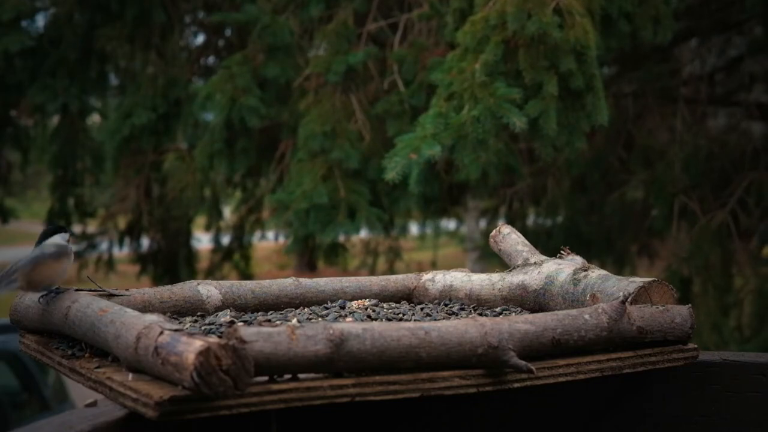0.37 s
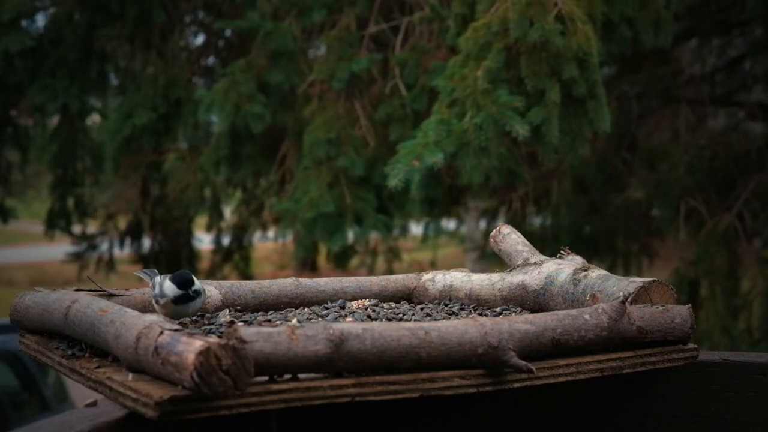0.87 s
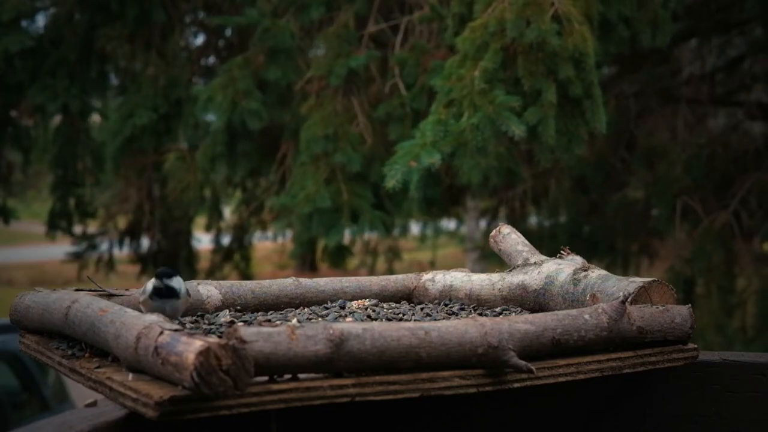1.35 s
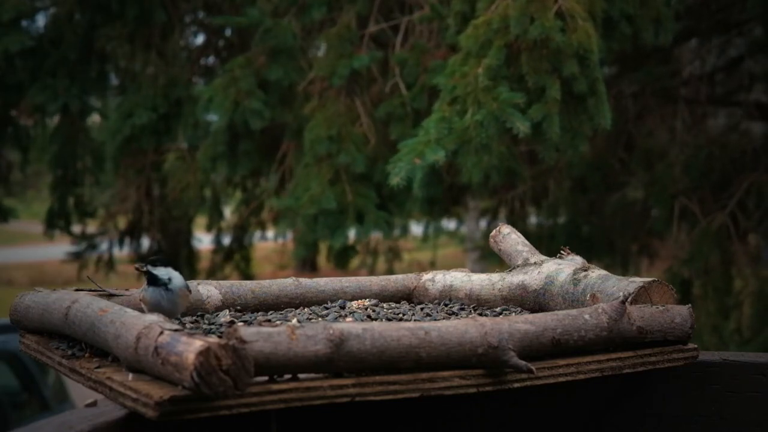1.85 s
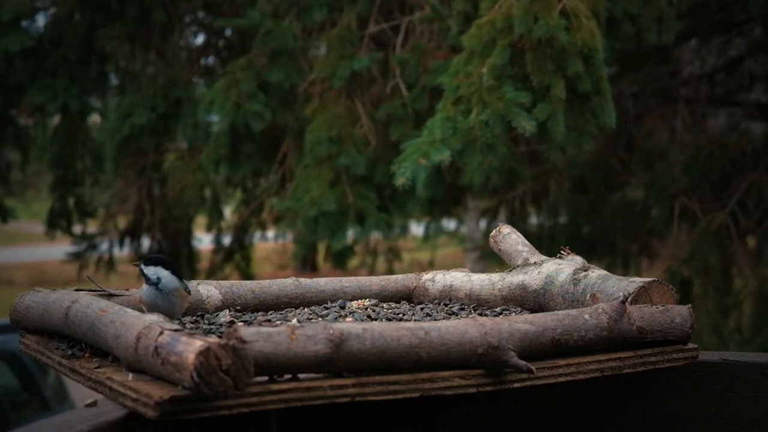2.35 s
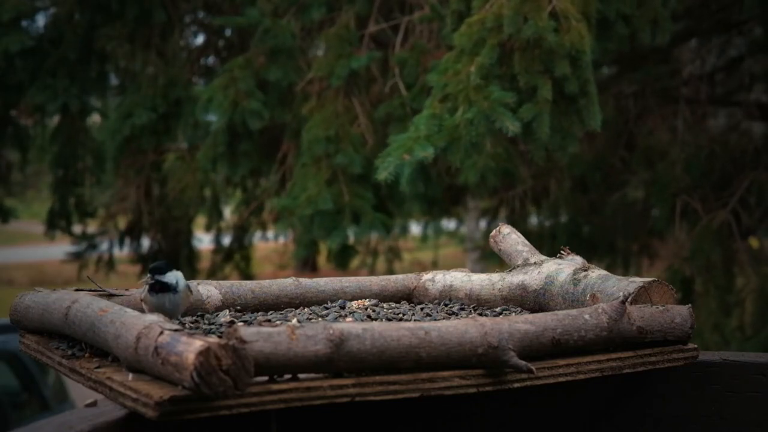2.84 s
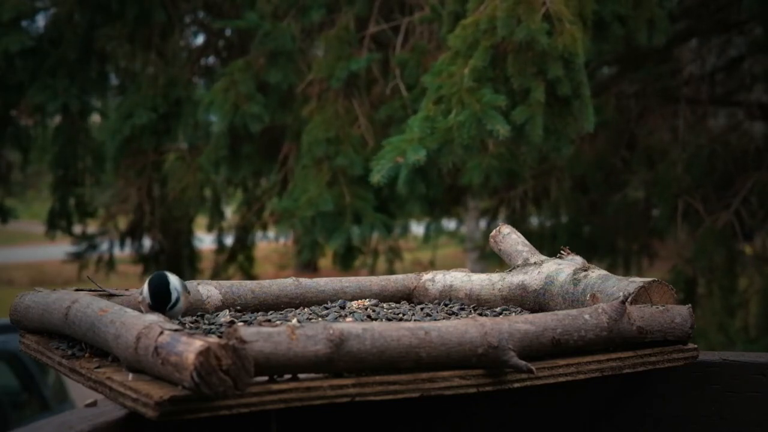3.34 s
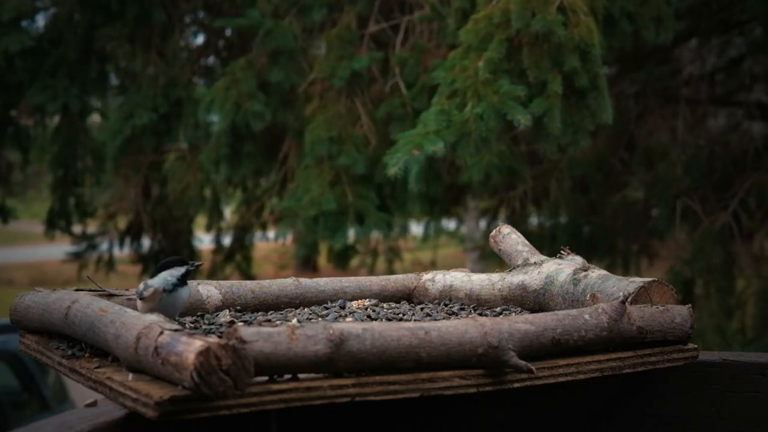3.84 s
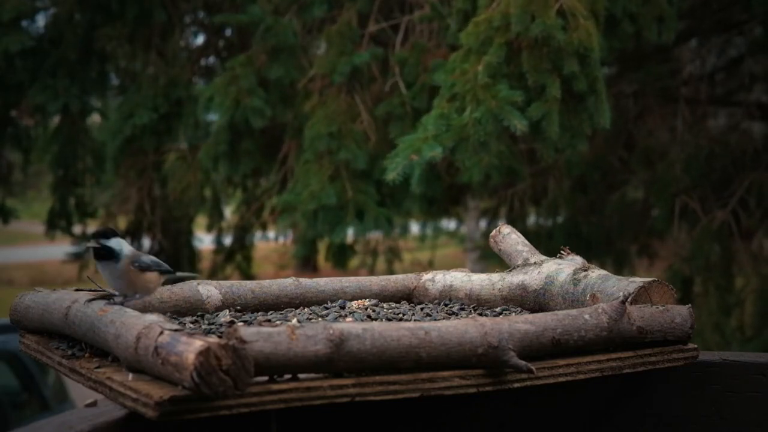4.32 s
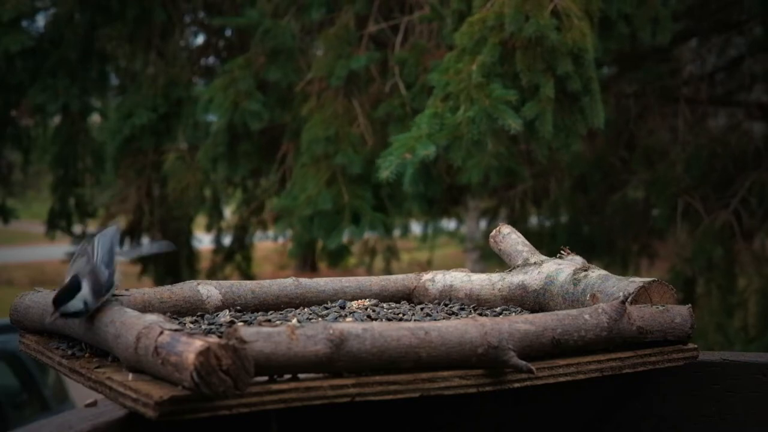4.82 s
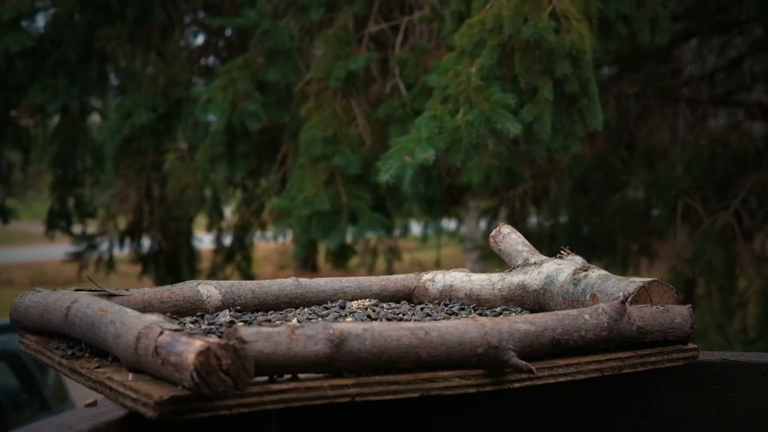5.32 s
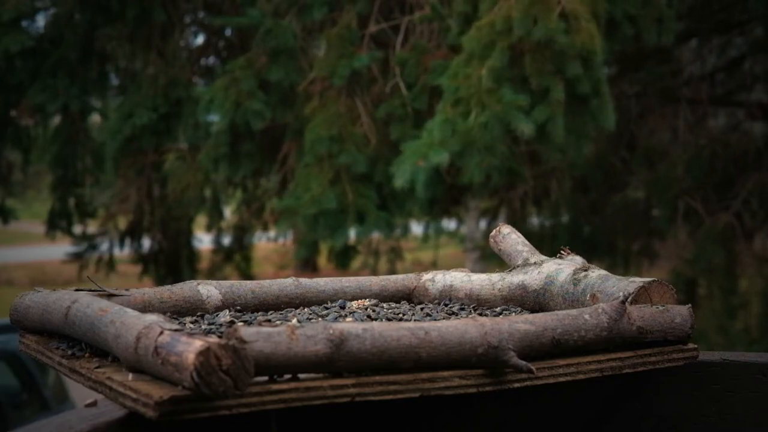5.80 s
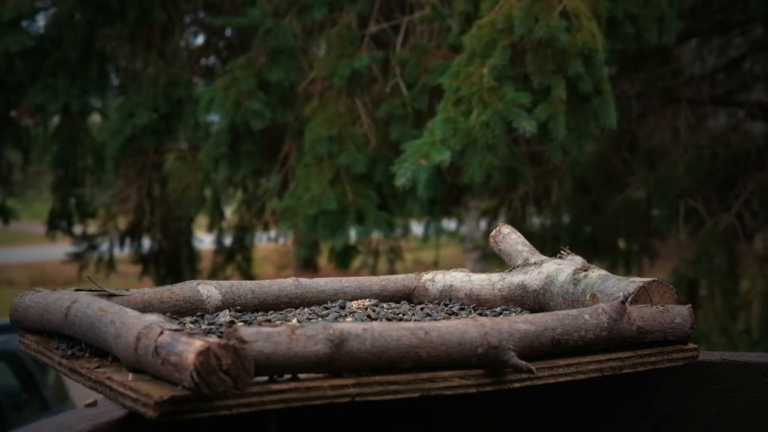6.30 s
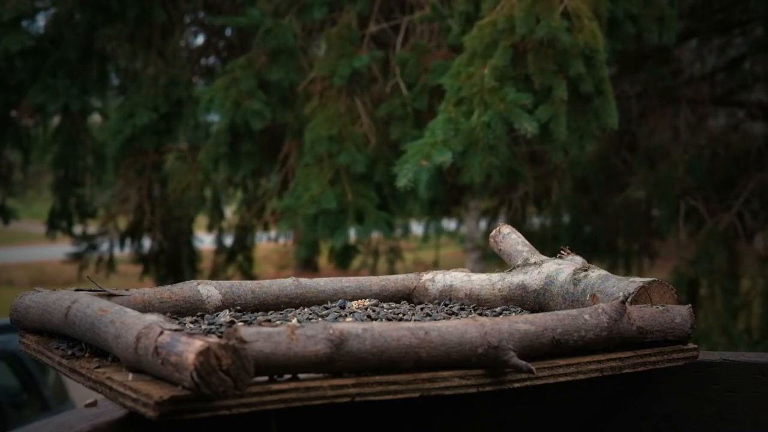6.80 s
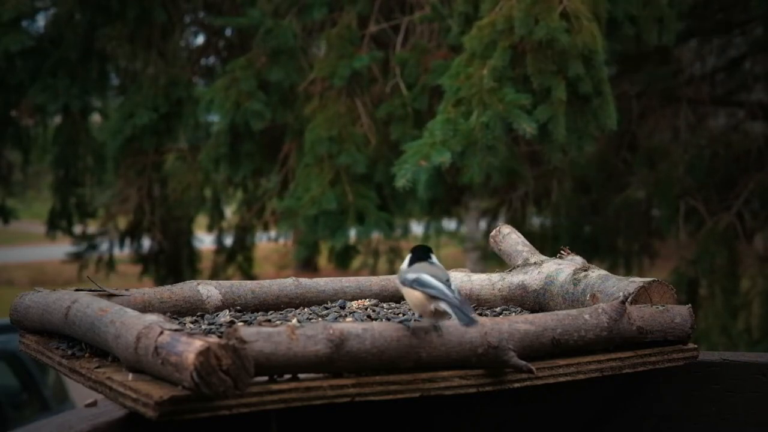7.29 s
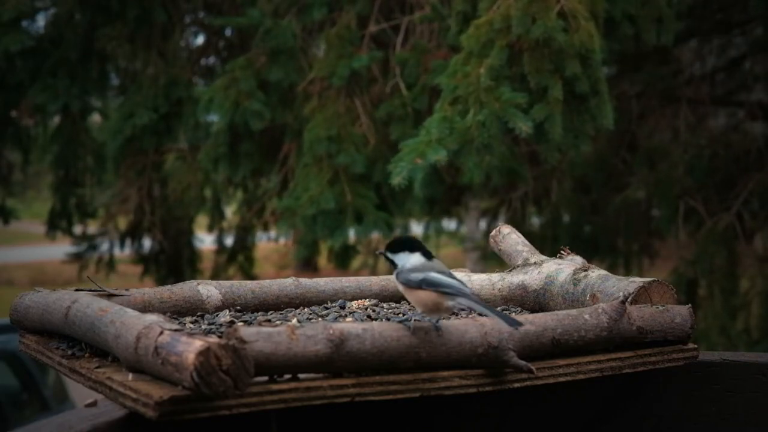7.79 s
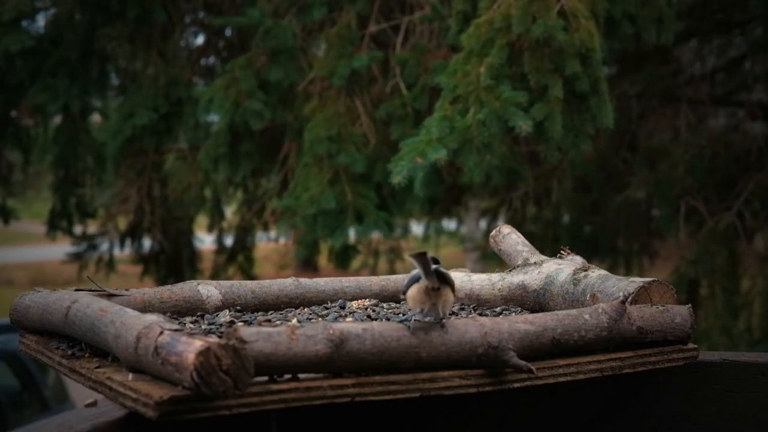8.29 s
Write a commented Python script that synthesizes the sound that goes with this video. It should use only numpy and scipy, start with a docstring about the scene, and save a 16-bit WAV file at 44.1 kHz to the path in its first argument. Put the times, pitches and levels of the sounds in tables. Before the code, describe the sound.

Small songbirds whistle, lisp, warble and call nasally around a wooden feeder among conifers, with a sharp chip and faint claw scuffs over soft hiss.

```python
"""Log feeder among conifers: small songbirds call, heard through a bright microphone with little bass.
Gliding sines make clear whistles, a burry warble, thin lisps, a rasp, falling chirps and one sharp chip;
seeps flip between two pitches, and nasal honks are harmonics shaped by a throat. Noise ticks of feet
scuff the ringing logs. All scatter off the trees, over filtered-noise foliage hiss and a far chorus of
faint notes; a widener spreads the single channel."""
import sys
import numpy as np
from scipy import signal
from scipy.fft import rfft, irfft, next_fast_len
from scipy.io import wavfile
from scipy.ndimage import uniform_filter1d

SR = 44100
rng = np.random.default_rng(int(sys.argv[2]) if len(sys.argv) > 2 else 0)


def dump(signal):
    """Clip the signal to [-1, 1] and save it as 16-bit WAV at the path in sys.argv[1]."""
    limited = np.clip(np.atleast_2d(signal).T, -1, 1)
    pcm = np.round(limited * 32767).astype(np.int16)
    wavfile.write(sys.argv[1], SR, pcm)


def gain_from_decibels(decibels):
    """Convert decibel values to linear amplitude factors."""
    exponent = np.asarray(decibels, float) / 20
    return 10 ** exponent


N = 381465
TIME_S = np.arange(N) / SR

# Note levels are those of the source, ahead of breath shape, scatter and microphone.
# level whistles: (start [s], length [s], pitch [Hz], level [dB])
WHISTLES = [(0.013, 0.097, 4163, -61), (0.209, 0.11, 4280, -63), (0.606, 0.054, 2480, -63.5),
            (0.784, 0.16, 2745, -65.5), (0.94, 0.082, 2600, -64), (1.834, 0.046, 2710, -62.5),
            (2.016, 0.079, 4290, -60), (2.209, 0.084, 3044, -58.5), (2.495, 0.09, 4240, -60),
            (2.992, 0.15, 3300, -64), (3.698, 0.03, 6260, -59.5), (3.918, 0.052, 6320, -56.5),
            (1.452, 0.16, 3640, -62), (3.319, 0.2, 2736, -72), (6.13, 0.059, 2640, -65),
            (6.526, 0.038, 4145, -55), (6.726, 0.021, 4630, -55), (6.933, 0.08, 3770, -68)]
# clear sweeps up or down: (start [s], length [s], start pitch [Hz], end pitch [Hz], level [dB])
SWEEPS = [(1.513, 0.065, 2000, 2950, -71.5), (5.624, 0.061, 2530, 2150, -67.5),
          (5.692, 0.048, 2350, 2900, -60), (5.734, 0.035, 2885, 2560, -57.5),
          (5.871, 0.044, 6050, 6420, -59), (2.255, 0.027, 2990, 5600, -50), (4.442, 0.044, 5100, 3950, -57),
          (4.659, 0.049, 4780, 4010, -56), (5.143, 0.042, 5200, 4920, -54), (5.915, 0.017, 6250, 4620, -49),
          (8.052, 0.18, 1114, 1305, -73.5), (8.293, 0.028, 5470, 5180, -56.5)]
# lightly rolled whistles that settle early: (start [s], length [s], start pitch [Hz], end pitch [Hz], level [dB])
ROLLS = [(2.035, 0.1, 2960, 3340, -43), (2.108, 0.077, 3256, 3010, -45), (5.982, 0.075, 4330, 3556, -51),
         (0.22, 0.06, 2960, 3075, -56), (0.352, 0.15, 3710, 3374, -59.5), (5.43, 0.12, 3080, 3110, -61.5),
         (5.55, 0.028, 3270, 2930, -57.5), (5.834, 0.054, 4920, 4530, -50.5),
         (6.112, 0.1, 3380, 3470, -48.5), (6.192, 0.077, 3476, 3424, -43),
         (6.278, 0.074, 4510, 4142, -36.5), (6.352, 0.096, 3470, 3470, -60.5)]
# burry song: (start [s], length [s], start pitch [Hz], end pitch [Hz], level [dB])
WARBLE = [(.66, 0.13, 2880, 3480, -48.5), (.76, 0.059, 3280, 3153, -46.5), (.895, 0.095, 3970, 3750, -44),
          (1.01, 0.096, 2976, 2843, -44), (1.162, 0.069, 2980, 2810, -45.5),
          (1.235, 0.052, 2935, 3100, -43), (1.305, 0.059, 3252, 3188, -39.5),
          (1.365, 0.095, 4100, 3560, -48.5), (1.53, 0.11, 4400, 4720, -44.5),
          (1.764, 0.032, 3120, 3215, -48.5), (1.92, 0.08, 3184, 3034, -41),
          (2.268, 0.028, 4390, 4390, -46.5)]
# whistles that drop onto a held pitch: (start [s], held pitch [Hz], level [dB])
HOOKS = [(6.376, 5080, -52.5), (6.598, 5130, -53), (6.81, 5120, -49.5)]
# short thin contact notes: (start [s], pitch [Hz], level [dB])
LISPS = [(0.655, 7160, -49.5), (1.089, 7240, -51.5), (1.196, 8910, -53), (2.291, 7730, -52.5),
         (3.644, 7020, -52), (4.068, 3720, -61), (4.46, 7240, -52.5), (4.487, 7980, -61),
         (5.724, 6970, -53.5), (5.855, 7360, -52.5), (6.036, 7280, -53.5), (6.411, 7110, -52.5),
         (7.805, 7250, -50), (7.937, 7200, -52), (8.31, 10230, -50)]
# one loud near rasp: (start [s], length [s], start pitch [Hz], end pitch [Hz], level [dB])
RASP = [(1.637, .056, 7610, 7000, -16.8)]
# two-pitch seeps, midway pitch: (start [s], length [s], start pitch [Hz], end pitch [Hz], level [dB])
SEEPS = [(-.06, 0.15, 7240, 7020, -38.5), (1.309, 0.26, 7820, 7250, -39), (6.619, 0.26, 7750, 7110, -57.5)]
# path of the near chip: (time [s], pitch [Hz], level [dB])
CHIP = [(5.033, 7050, -38), (5.038, 8360, -26), (5.04, 8260, -20.5), (5.043, 7270, -23.5),
        (5.048, 6940, -25), (5.051, 6080, -22), (5.052, 4850, -22.5), (5.056, 4220, -43.5),
        (5.061, 2650, -57.5)]
# run of falling chirps: (start [s], pitch factor [ratio], level [dB])
FALLS = [(7.09, 0.97, -57), (7.219, 0.94, -50.5), (7.332, 0.97, -51), (7.451, 1.0, -50.5),
         (7.578, 1.0, -51), (7.702, 0.97, -52)]
# their common shape at factor 1: (time [s], pitch [Hz], relative level [dB])
FALL_SHAPE = [(0, 5386, -5), (.01, 5500, 1.5), (.018, 4800, 0.5), (.028, 4100, -1), (.045, 3700, -6.5),
              (.063, 3050, -11.5)]
# nasal honks: (start [s], pitch before arching [Hz], mid-note throat resonance [Hz], level [dB])
HONKS = [(2.012, 562.5, 2390, -46), (2.124, 530, 2340, -45.5), (3.086, 564, 2460, -44.5),
         (3.214, 513, 2520, -52.5), (3.756, 542, 2590, -52), (3.884, 513.4, 2470, -55),
         (4.27, 504, 2230, -65), (7.736, 536, 2730, -52.5), (7.885, 509, 2180, -53.5),
         (8.341, 530, 2670, -40.5), (8.46, 510, 2770, -42)]
# feet and wings on the logs: (start [s], length [s], level before colouring [dB], ring re level [dB])
SCUFFS = [(2.265, 0.1, -68.5, -22), (3.423, 0.026, -72.5, -16), (6.055, 0.039, -54.5, -29),
          (6.412, 0.013, -66, -9), (6.634, 0.036, -61, -20), (6.901, 0.037, -61, 1), (7.44, 0.015, -65, -6),
          (8.312, 0.038, -63.5, -17), (8.504, 0.026, -59.5, -15)]
# hollow log modes: (frequency [Hz], t60 [s], relative level [dB])
LOG_MODES = [(1253, 0.042, 8.5), (2630, 0.027, 7), (3300, 0.016, -42)]
# far birds, mean level of one note: (time [s], level [dB])
CHORUS = [(0, -71), (.3, -76), (4.8, -85.5), (5.3, -69.5), (5.7, -77), (6.0, -71.5), (6.8, -75),
          (7.5, -73.5), (8.2, -69), (8.65, -76.5)]
# relative hiss spectrum: (frequency [Hz], density [dB per Hz])
HISS = [(60, -66), (100, -51.5), (480, -36.5), (1180, -24.5), (2200, -16.5), (3300, -9), (4100, -7.5),
        (4500, -8), (5200, -2), (5900, -7), (8100, -7.5), (10000, -14.5), (15500, -18)]
# side against mid: (frequency [Hz], level [dB])
WIDENER = [(200, -4), (700, -7), (4400, -7), (8000, -7), (15000, -11.5)]

HOOK_S, HOOK_RISE = 0.105, 1.19  # length; start pitch over held pitch
LISP_S, HONK_S = 0.026, 0.076
SEEP_SWING_HZ = 505  # either side of the midway pitch
PAIR_GAP_S = 0.2  # a honk starting this soon after another is the answer of a pair
# throat narrowness: dB per squared octave at the reference pitch, and its growth per Hz above
NARROW_DB, NARROW_DB_PER_HZ, NARROW_AT_HZ = 89, 1.6, 530
TREES_T60_S = 0.31
NEAR_T60_S, NEAR_DB = 0.027, 4.5  # first echoes off logs and nearest boughs; level re scatter
HISS_DB = -57
MIC_BEND = 0.016  # square-law share, before its filter
WIDENER_PEAK_S = 0.029
TOP_HZ = 15780


def colour(x, points):
    """Filter by (frequency [Hz], gain [dB]) points, log-frequency interpolated."""
    hz, db = np.transpose(points)
    size = next_fast_len(len(x) + 4096)
    bin_hz = np.fft.rfftfreq(size, 1 / SR) + 1  # offset avoids log 0
    gain = gain_from_decibels(np.interp(np.log(bin_hz), np.log(hz), db))
    return irfft(rfft(x, size) * gain, size)[:len(x)]


def unit(x):
    """Scale to rms 1."""
    return x / np.sqrt(np.mean(x ** 2))


def unit_energy(x):
    """Scale an impulse response to energy 1."""
    return x / np.sqrt(np.sum(x ** 2))


def walk(rate_hz, size):
    """Smooth chance that changes rate_hz times a second; spread near 1."""
    k = max(int(SR / rate_hz), 1)
    steps = np.repeat(rng.standard_normal(size // k + 2), k)
    return 1.3 * uniform_filter1d(uniform_filter1d(steps, k), k)[:size]


def add(track, start_s, sound):
    """Mix a sound in at its start, trimmed to the track."""
    i = int(start_s * SR)
    sound = sound[max(-i, 0):N - i]
    track[max(i, 0):max(i, 0) + len(sound)] += sound


def swell(length_s, edge):
    """Progress 0-1 through a note and its breath pressure."""
    q = np.linspace(0, 1, int(length_s * SR))
    return q, np.sin(np.pi * q) ** edge


def tone(hz):
    """A sine of rms 1 that follows the pitch."""
    return np.sqrt(2) * np.sin(2 * np.pi * np.cumsum(hz) / SR)


def glides(notes, shiver, shiver_hz, waver_db, edge, settle=1):
    """Single-membrane notes: a glide (sooner for larger settle), uneven relative shiver, unsteady breath."""
    out = np.zeros(N)
    for start_s, length_s, from_hz, to_hz, db in notes:
        q, breath = swell(length_s, edge)
        hz = to_hz + (from_hz - to_hz) * (1 - q) ** settle
        beat = tone(shiver_hz * (1 + 0.3 * walk(60, len(q)))) + 0.6 * walk(250, len(q))
        waver = walk(120, len(q))
        gain = gain_from_decibels(db + waver_db * (waver - waver.mean()))
        add(out, start_s, gain * breath * tone(hz * (1 + shiver * beat)))
    return out


def warble():
    """Burry song: the pitch shivers strongly around each glide."""
    return glides(WARBLE, shiver=0.028, shiver_hz=104.85, waver_db=1.5, edge=0.61)


def whistles():
    """Nearly pure level notes and sweeps with a faint shiver."""
    level_notes = [(start_s, length_s, hz, hz, db) for start_s, length_s, hz, db in WHISTLES]
    return glides(level_notes + SWEEPS, shiver=0.0082, shiver_hz=61, waver_db=2.0, edge=0.28)


def rolls():
    """Whistles with a light fast roll, reaching their end pitch early."""
    return glides(ROLLS, shiver=0.0079, shiver_hz=85.5, waver_db=3.5, edge=0.17, settle=2.6)


def hooks():
    """Whistles that start high and settle down onto the held pitch."""
    notes = [(start_s, HOOK_S, HOOK_RISE * hz, hz, db) for start_s, hz, db in HOOKS]
    return glides(notes, shiver=0.001, shiver_hz=61, waver_db=1.5, edge=0.52, settle=2.2)


def lisps():
    """Brief level notes roughened by shiver."""
    notes = [(start_s, LISP_S, hz, hz, db) for start_s, hz, db in LISPS]
    return glides(notes, shiver=0.014, shiver_hz=133.0, waver_db=3.0, edge=0.46)


def rasp():
    """A short falling note, harsh from deep fast shiver."""
    return glides(RASP, shiver=0.04, shiver_hz=170, waver_db=3, edge=1.3)


def seeps():
    """The pitch dwells on a high and a low step and jumps between them, so two bands sound."""
    out = np.zeros(N)
    for start_s, length_s, from_hz, to_hz, db in SEEPS:
        q, breath = swell(length_s, 0.3)
        flip = np.tanh(5.0 * tone(76 * (1 + 0.2 * walk(40, len(q)))))
        hz = from_hz + (to_hz - from_hz) * q + SEEP_SWING_HZ * flip + 110 * walk(300, len(q))
        add(out, start_s, gain_from_decibels(db + walk(200, len(q))) * breath * tone(hz))
    return out


def chip():
    """One sine: a fast hook up, then a dive of over five kilohertz."""
    time_s, hz, db = np.transpose(CHIP)
    sounding = (TIME_S > time_s[0]) & (TIME_S < time_s[-1])
    return gain_from_decibels(np.interp(TIME_S, time_s, db)) * sounding * tone(np.interp(TIME_S, time_s, hz))


def falls():
    """The same steep-then-slow dive, repeated."""
    out = np.zeros(N)
    shape_s, shape_hz, shape_db = np.transpose(FALL_SHAPE)
    t = TIME_S[:int(shape_s[-1] * SR)]
    for start_s, factor, db in FALLS:
        gain = gain_from_decibels(db + np.interp(t, shape_s, shape_db) + 1.5 * walk(120, len(t)))
        hz = uniform_filter1d(np.interp(t, shape_s, shape_hz), size=150)
        add(out, start_s, gain * tone(factor * hz))
    return out


def honks():
    """A buzz of harmonics 3-9 through the throat; a first honk arches, its answer sags, both crack at the end."""
    out = np.zeros(N)
    answers = np.diff([row[0] for row in HONKS], prepend=0) < PAIR_GAP_S
    for answer, (start_s, top_hz, throat_mid_hz, db) in zip(answers, HONKS):
        q, breath = swell(HONK_S, 0.46)
        if answer:
            drop = 0.045 * (q - 0.5) + 0.08 * q ** 8
        else:
            drop = 0.076 * np.exp(-q / 0.12) + 0.15 * q ** 7
        # the pitch roughens as the bill opens
        hz = top_hz * (1 - drop) + (7.5 + 14 * q ** 5) * walk(130, len(q))
        throat_hz = throat_mid_hz * (1 + 0.27 * (q - 0.5))
        # tenser, higher honks come through a narrower throat
        narrow_db = NARROW_DB + NARROW_DB_PER_HZ * (top_hz - NARROW_AT_HZ)
        buzz = 0
        for k in range(3, 10):
            # the -27 dB floor is a soft low shoulder that lets the third harmonic through
            throat_db = np.maximum(-narrow_db * np.log2(k * top_hz / throat_hz) ** 2, -27)
            top_loss_db = 51 * max(k * top_hz / 3200 - 1, 0) ** 0.5
            buzz = buzz + gain_from_decibels(throat_db - top_loss_db + 2.7 * walk(120, len(q))) * tone(k * hz)
        add(out, start_s, gain_from_decibels(db) * breath * unit(buzz))
    return out


def scuffs():
    """Claws scratch in uneven noise ticks; the hollow log's decaying modes ring briefly."""
    out, t = np.zeros(N), TIME_S[:SR // 10]
    ring = sum(gain_from_decibels(db - 60 * t / t60_s) * np.sin(2 * np.pi * hz * t) for hz, t60_s, db in LOG_MODES)
    for start_s, length_s, db, ring_db in SCUFFS:
        q, press = swell(length_s, 0.47)
        ticks = rng.standard_normal(len(q)) * gain_from_decibels(3 * rng.exponential(size=len(q)))
        ticks = press * unit(ticks)
        scratch = colour(ticks, [(300, -37), (2000, 7), (3500, 20), (9000, 2.0), (16000, -14.0)])
        add(out, start_s, gain_from_decibels(db) * scratch)
        add(out, start_s, gain_from_decibels(db + ring_db) * signal.fftconvolve(ticks, unit_energy(ring)))
    return out


def trees(x, wet_db):
    """Direct sound plus quick near echoes and a dense decaying scatter off trunks and boughs."""
    t = TIME_S[:int(1.5 * TREES_T60_S * SR)]
    fade = gain_from_decibels(-60 * t / TREES_T60_S) + gain_from_decibels(NEAR_DB - 60 * t / NEAR_T60_S)
    echo = rng.standard_normal(len(t)) * fade * np.minimum(t / 0.0054, 1)
    echo = colour(echo, [(2000, -1.5), (7500, -1.0), (11000, -8.0)])  # needles swallow the highest notes
    return x + gain_from_decibels(wet_db) * signal.fftconvolve(x, unit_energy(echo))[:N]


def chorus():
    """Far birds: a blur of 2600 faint falling notes spread over the treble."""
    draw = rng.random((2600, 4))
    start_s = draw[:, 0] * N / SR
    hz = 3800 + 4800 * draw[:, 1]
    db = np.interp(start_s, *np.transpose(CHORUS)) + 4 * (draw[:, 2] - 0.5)
    length_s = 0.02 + 0.037 * draw[:, 3]
    notes = zip(start_s, length_s, 1.04 * hz, 0.96 * hz, db)
    return glides(notes, shiver=0.03, shiver_hz=110.1, waver_db=2.5, edge=3.2)


def hiss():
    """Shaped noise: foliage, a steady insect band near five kilohertz and microphone noise."""
    return gain_from_decibels(HISS_DB + 0.5 * walk(4, N)) * unit(colour(rng.standard_normal(N), HISS))


def scene():
    """Each source with its own share of scatter, at a single microphone."""
    birds = trees(warble(), -2.5) + trees(whistles() + rolls(), -3.5) + trees(hooks(), -9)
    birds = birds + trees(lisps(), -3.5) + trees(rasp(), 0.58) + trees(seeps(), 0.66)
    birds = birds + trees(chip(), 0.55) + trees(falls(), -9.5) + trees(honks(), -8.5)
    birds = birds + trees(chorus(), 6.7)
    # the microphone sheds the bass
    mono = colour(birds + trees(scuffs(), -4), [(100, -52), (1000, -2.5)]) + hiss()
    return np.array([mono, mono])


def microphone_bend(mono):
    """Square-law distortion product, growing fastest with the loudest notes."""
    return MIC_BEND * colour(mono ** 2, [(30, -31), (800, -2.5)])


def widener_side(mono):
    """Side signal: a late cloud of sparse random echoes."""
    x = TIME_S[:int(5 * WIDENER_PEAK_S * SR)] / WIDENER_PEAK_S
    taps = rng.standard_normal(len(x)) * rng.exponential(size=len(x)) * (x * np.exp(-x)) ** 1.8
    return colour(signal.fftconvolve(mono, unit_energy(taps))[:N], WIDENER)


def band_limit(x):
    """A steep low-pass at the top of the band."""
    return signal.sosfilt(signal.butter(12, 17060, fs=SR, output="sos"), x)


def record(dry):
    """Bend the microphone, add the side signal to one channel and take it from the other, cut the top."""
    side = widener_side(dry[0])
    wide = dry + microphone_bend(dry[0]) + np.array([side, -side])
    top_cut = signal.ellip(10, 0.2, 70, TOP_HZ, fs=SR, output="sos")
    mix = signal.sosfilt(top_cut, wide)
    return band_limit(mix)


dry = scene()
out = record(dry)
dump(out)
```